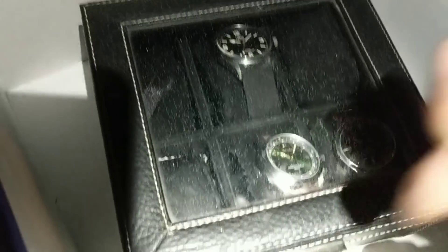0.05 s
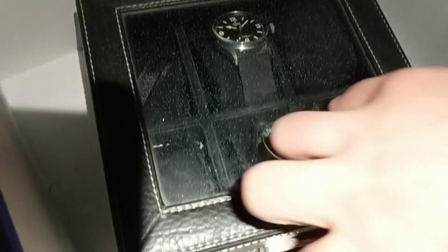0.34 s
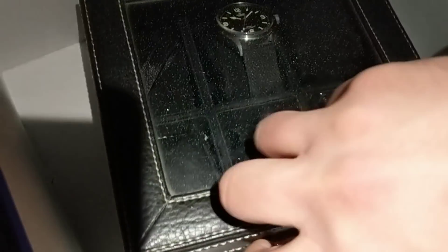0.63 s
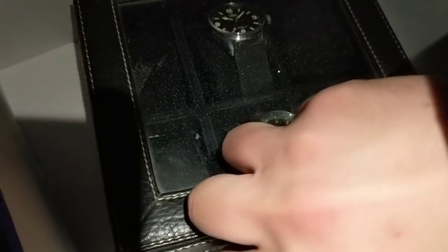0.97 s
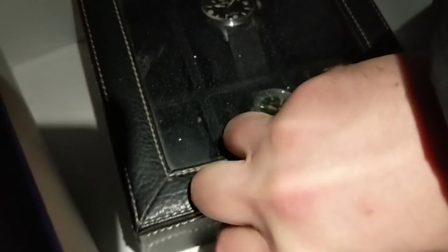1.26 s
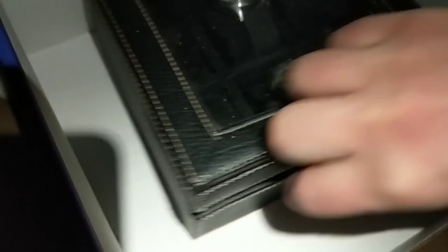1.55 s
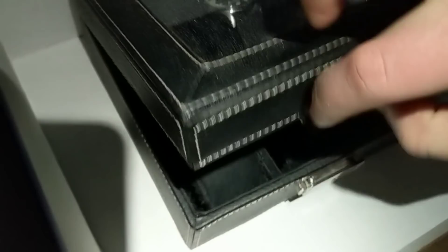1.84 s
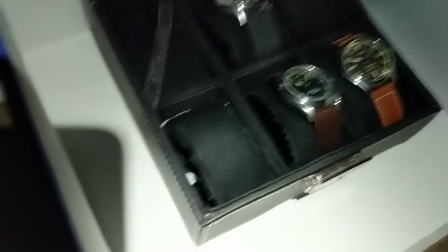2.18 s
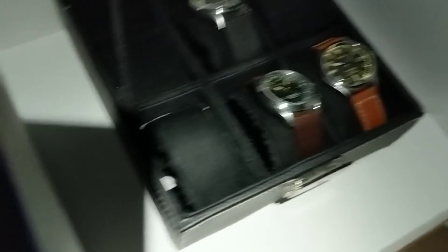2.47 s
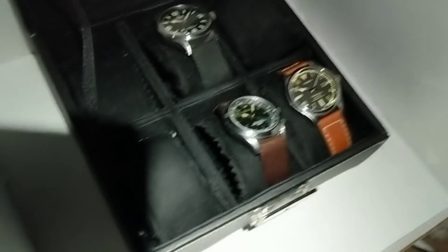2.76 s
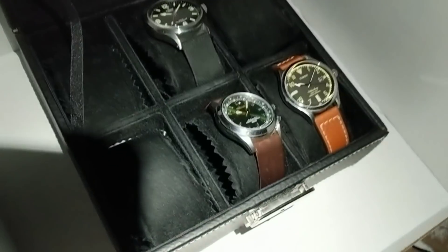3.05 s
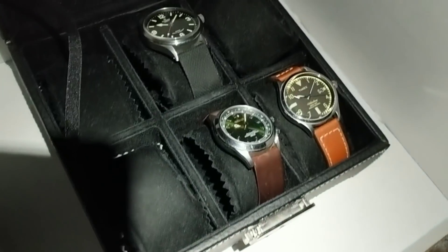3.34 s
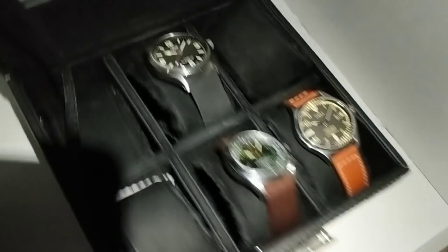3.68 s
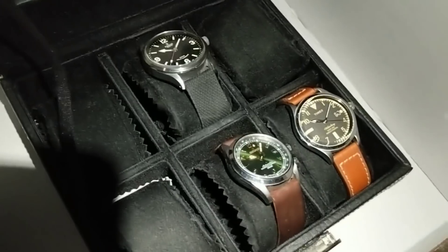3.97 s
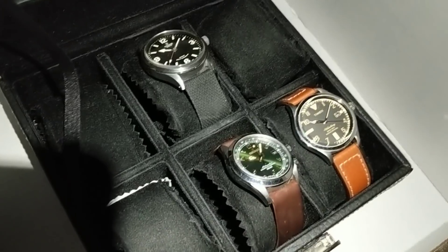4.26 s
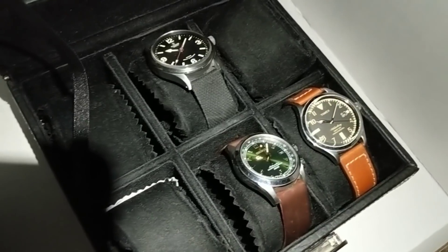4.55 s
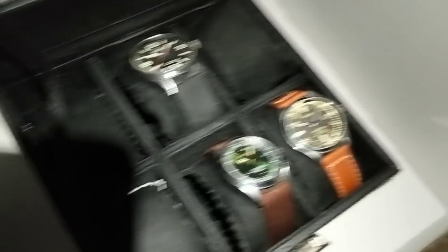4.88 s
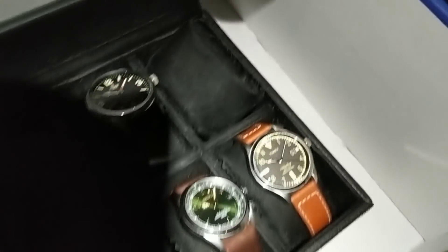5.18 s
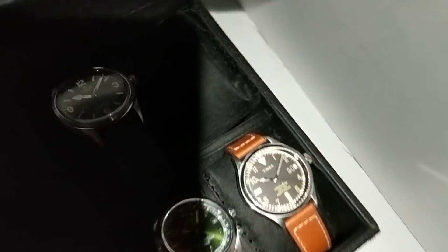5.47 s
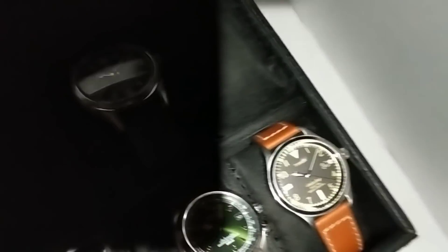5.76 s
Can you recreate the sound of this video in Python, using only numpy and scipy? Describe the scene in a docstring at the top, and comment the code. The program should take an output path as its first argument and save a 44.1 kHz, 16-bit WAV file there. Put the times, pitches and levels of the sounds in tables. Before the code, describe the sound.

Heard very close in a small, quiet room, a hand handles a leather watch box over faint sleeve swish and low rumble. From 0.3 seconds come light hollow taps and creaks, with a short, low hum of a fingertip juddering on the lid's window around 0.5. A faint metal tick sounds at 0.8, then rubbing and crackling from 1.2. At 1.6 the steel catch snaps with a sharp, very high ping, the loudest moment, followed by a scrape at 1.8. From 2.2 to 2.9 the lid swings open with dense leather scrapes, crackles, knocks and a tiny squeak, ending in soft thuds of the box on its shelf. Around 3.5 the box bumps again and drags, with a crisp, crackling scrape at 3.7 and a small tap. After 4 seconds it is nearly quiet, until a faint tap at 5.7 and a soft sleeve swish.

```python
"""A leather watch box is opened by hand: leather scrapes and crackles by stick-slip friction,
the steel catch snaps and rings, and the window lid swings open. Finger taps excite the modes of the box,
a fingertip judders on the window, and the box bumps on its shelf. The microphone is close,
in a small, quiet room, with a sleeve swishing past it and a low rumble of handling."""
import sys
import numpy as np
from scipy import signal
from scipy.io import wavfile
from scipy.ndimage import uniform_filter1d

SR = 44100
rng = np.random.default_rng(int(sys.argv[2]) if len(sys.argv) > 2 else 0)


def wav_out(sig):
    """Save sig, one row per channel (or a flat mono array), as 16-bit PCM at SR to the path in sys.argv[1]."""
    wavfile.write(sys.argv[1], SR, np.round(np.clip(np.atleast_2d(sig).T, -1, 1) * 32767).astype(np.int16))


N = 260939

# Leather sliding on skin and shelf as the hand lands, works the catch, swings the lid and drags the box:
# (start [s], length [s], level [dB], attack [s], release [s], swell [dB], hollow body [dB],
# hiss share [dB], hiss tilt [dB/octave], unevenness [dB], pitch of rasp and hollow [ratio])
STROKES = [ (0.346, .09, -46, .01, 0.051, -9, -12, 0, -5, 8, 1),
           (1.164, .19, -39, 0.0063, 0.051, -1, -11.5, -5, -5, 1, 0.82),
           (1.349, 0.15, -46, 0.038, 0.035, -8, -7.5, -3.5, -2.5, 5.5, 1.01),
           (1.529, 0.14, -38.5, 0.044, 0.033, -7, -2.5, -7, 5, -0.5, 1.08),
           (1.676, 0.056, -36, 0.0036, 0.0099, -17, -6.5, -4.5, 0, 2, 0.91),
           (1.733, 0.091, -57.5, 0.024, 0.047, -1, 20.5, -13, -2, 3, 0.53),
           (1.816, .13, -24, 0.046, 0.015, -6, -12, -2.5, -1, -1, 1.06),
           (2.281, 0.17, -40, 0.0031, 0.042, 3, -0.5, -5.5, -1, 4, 1),
           (2.415, 0.063, -33.5, 0.013, 0.0054, 9, -5.5, -2.5, 6, 3, 1.52),
           (2.473, .04, -19.5, 0.01, 0.015, -8, -9.5, 3, 3.5, 0.5, 0.97),
           (2.49, .2, -25, 0.018, .06, -1, -10, -1.56, -3.5, 2, 0.98),
           (2.682, .142, -22.5, 0.011, .045, 13, -12, -3.5, -2.5, 1, 0.86),
           (2.801, 0.12, -49, 0.0056, 0.033, -35, 2.5, 0, 5, 8, 0.71),
           (3.604, 0.26, -32.5, .004, .03, -1.5, -9.5, -2, -5, 3.5, 0.96),
           (3.706, 0.091, -20.5, 0.0031, 0.041, 3.5, -20.5, -0.5, -6, 1, 1.05),
           (4.183, .2, -54.5, .06, 0.1, -1, -9, -10, -2, 3, 0.74)]
# Spectrum of the hollow box: (frequency [Hz], level [dB])
HOLLOW_SPECTRUM = [(60, -29), (130, -10.5), (270, 2), (420, -8.5), (620, -1), (900, -14.5), (1500, -15),
                   (4000, -55.5)]


def stroke(start, length, db, attack, release, swell_db, hollow_db, hiss_db, tilt, uneven_db, pitch):
    """Stick-slip friction: clumps of slips rasp and hiss at the surface and drive the hollow box."""
    # Coarse and fine friction spectra: (frequency [Hz], level [dB])
    rasp_spectrum = [(350, -19), (600, -10), (1050, 4.5), (1500, 3), (2000, 1.5), (2700, 4), (3800, -0.5),
                     (4800, -0.5), (6000, -8.5), (9000, -45.5)]
    hiss_spectrum = [(2500, -22.5), (4200, -6), (5300, -4), (6400, -2), (7800, 0), (8900, -3),
                     (10000, -1.5), (12000, -7), (15500, -12.5)]
    t = np.arange(0, length, 1 / SR)
    pressure_db = swell_db * (t / length - .5)
    clumps = amp(uneven_db * unit(uniform_filter1d(noise(len(t)), size=180)))
    drives = [reflect(slips(len(t), per_s=6000, spread_db=1.5, smooth=1.55) * clumps) for _ in range(3)]
    rasp = colour(drives[0], [(hz * pitch, level) for hz, level in rasp_spectrum])
    hiss = colour(drives[1], hiss_spectrum, tilt)
    hollow = colour(drives[2], [(hz * pitch, level) for hz, level in HOLLOW_SPECTRUM])
    hiss_share = np.clip(amp(hiss_db + .38 * pressure_db), 0, .97)  # grows as the stroke swells
    scrape = hiss_share * hiss + np.sqrt(1 - hiss_share ** 2) * rasp
    sound = amp(-1) * scrape + amp(hollow_db + .5) * hollow
    return start, amp(db + pressure_db) * envelope(t, length, attack, release) * sound


def crackle(start, db, tilt, lead_s=.003, lead_db=-12, rise_s=.00023, t60=.025):
    """Stress release: a crease starts to give, then lets go in a quick, dying flurry of slips."""
    # Spectrum of a yielding crease: (frequency [Hz], level [dB])
    crease_spectrum = [(150, -19), (500, 3.5), (1200, 0.5), (2400, 1), (3800, 2), (5500, 1.5), (7800, 5),
                       (10500, -0.5), (13000, -8), (15500, -4.5)]
    t = np.arange(4096) / SR
    free_s = np.maximum(t - lead_s, 0)
    giving = amp(lead_db) * np.minimum(t / lead_s, 1)
    shape = (giving + 1 - np.exp(-free_s / rise_s)) * decay(free_s, t60)
    flurry = slips(len(t), per_s=4000, spread_db=-6, smooth=.78) * shape
    burst = colour(reflect(flurry), crease_spectrum, tilt)
    return start - lead_s, amp(db - 2) * burst * np.sqrt(np.mean(shape ** 2)) / shape.max()


def shed_crackles(per_s=16, tries=8, above_stroke_db=3):
    """Random release: each stroke frees small creases that follow its level and its brightness."""
    for start, length, db, attack, release, swell_db, _, hiss_db, *_ in STROKES:
        for place, chance in rng.random((tries, 2)):
            if chance < per_s * length / tries:
                delay = attack + place * (length - attack - release)
                stroke_db = db + swell_db * (delay / length - .5)
                yield start + delay, stroke_db + above_stroke_db, .42 * hiss_db


def snap(start, db, hold_s, rise_s=.00019, flicker=.087):
    """Modal ringing: a bright steel ping, held level for a moment as by a limiter, then dying quickly."""
    # Ringing tones of the catch and its wall, plus a faint 8.3 kHz distortion tone from the
    # overloaded ping: (frequency [Hz], level [dB], t60 [s])
    ping_tones = [(11925, 0, .014), (11890, -33, .085), (12280, -25, .02), (8290, -28, .035),
                  (3213, -26, .02), (2526, -25, .02), (2258, -25, .02), (1998, -23, .023), (1032, -20, .03),
                  (409, -21, .04)]
    t = np.arange(SR // 6) / SR
    after_hold_s = np.maximum(t - hold_s, 0)
    ring = sum(amp(level) * decay(after_hold_s, t60) * np.sin(2 * np.pi * hz * t)
               for hz, level, t60 in ping_tones)
    uneven = 1 + flicker * unit(uniform_filter1d(noise(len(t)), size=50))
    return start, amp(db) * ring * uneven * (1 - np.exp(-t / rise_s))


def knock(start, db, hardness, lowest_hz, rise_s=.00038, scatter_db=6.5):
    """Modal excitation: a harder blow favours the higher modes; the fingertip scuffs as it lands."""
    # Modes of the box: (frequency [Hz], level [dB], base t60 [s])
    box_modes = [(300, 3.5, 0.061), (466, -12.5, 0.033), (634, -8, 0.045), (790, -32.5, 0.012),
                 (1045, -2.5, 0.035), (1220, -10, 0.024), (2022, -12.5, 0.019), (2586, -17, 0.026),
                 (3220, -25.5, 0.026)]
    t = np.arange(SR // 5) / SR
    hz, level, t60 = np.array(box_modes, float).T[:, :, None]
    hz[0] = lowest_hz  # the lowest mode moves with the grip
    t60 *= .85 * .5 ** (hardness / 8.6)  # a firm finger damps the ring
    mode_db = level + scatter_db * noise(hz.shape) + hardness * np.log2(hz / lowest_hz)
    gains = amp(mode_db) * rng.choice([-1, 1], hz.shape)
    ring = (gains * decay(t, t60) * np.sin(2 * np.pi * hz * t)).sum(0)
    ring /= np.std(ring[:SR // 200])
    scuff = amp(-9) * colour(noise(len(t)), HOLLOW_SPECTRUM, hardness + 5) * decay(t, t60=.06)
    return start, amp(db) * (ring + scuff) * (1 - np.exp(-t / rise_s))


def bump(start, db, hz, t60, rise_s=.0034):
    """Damped oscillation: the weight of the box gives the shelf a soft, low push."""
    t = np.arange(SR // 3) / SR
    thud = np.sin(2 * np.pi * hz * t) * (1 - np.exp(-t / rise_s)) * decay(t, t60)
    return start, amp(db) * thud / abs(thud).max()


def judder(start, length, db, base_hz=157.5, drop_hz=22, settle_s=.017, sag_hz_per_s=22):
    """Periodic stick-slip: skin on the window gives a nearly pure tone that drops quickly, then sags."""
    t = np.arange(0, length, 1 / SR)
    hz = base_hz + drop_hz * np.exp(-t / settle_s) - sag_hz_per_s * t
    phase = 2 * np.pi * np.cumsum(hz) / SR
    tone = np.sin(phase) + amp(-25) * (np.sin(2 * phase) + np.sin(3 * phase))
    return start, amp(db) * envelope(t, length, attack=.018, release=.072) * tone


def squeak(start, length, db, hz, width_hz):
    """Narrow-band friction noise: for an instant the slips fall nearly into step and whistle."""
    whistle = unit(bandpass(noise(round(length * SR)), hz - width_hz / 2, hz + width_hz / 2))
    return start, amp(db) * whistle * signal.windows.tukey(len(whistle), .5)


def reflect(x, strength=.14, count=6):
    """Comb filtering: hand, lid and shelf return each contact within 4 ms."""
    taps = np.zeros(SR // 250)
    taps[rng.integers(len(taps) // 10, len(taps), count)] = strength * rng.choice([-1, 1], count)
    taps[0] = 1
    return signal.lfilter(taps, 1, x)


def room(x, low_t60=.28, high_t60=.225, wet_db=-22, echoes_per_s=3000):
    """Reverberation: near walls return a short tail whose treble dies first."""
    t = np.arange(SR // 2) / SR
    echoes = noise(len(t)) * (rng.random(len(t)) < echoes_per_s / SR) * (t > .004)
    low = signal.sosfilt(signal.butter(2, 1500, fs=SR, output="sos"), echoes)
    high = bandpass(echoes, 1500, 7000)
    tail = low * decay(t, low_t60) + .5 * high * decay(t, high_t60)
    return amp(wet_db) * signal.fftconvolve(x, tail / np.linalg.norm(tail))[:N]


def arm_motion(still_sleeve_db=-58, still_grip_db=-56.5):
    """Incoherent addition: a bell-shaped swell per movement adds in power to sleeve and grip gains."""
    # Arm movements: (peak time [s], half width [s], sleeve swish [dB], grip rumble [dB])
    moves = [(.55, 0.41, -50, -49.5), (1.2, .35, -51.5, -49), (1.7, 0.23, -48, -42),
             (2.45, 0.43, -47.5, -48), (3.07, 0.045, -52, -45.5), (3.718, 0.18, -45.5, -47),
             (4.95, 0.067, -59, -61), (5.92, 0.2, -47, -55.5)]
    t = np.arange(N) / SR
    power = amp([[still_sleeve_db], [still_grip_db]]) ** 2
    for peak, width, sleeve_db, grip_db in moves:
        swell = np.exp(-.5 * ((t - peak) / width) ** 2)
        power = power + (amp([[sleeve_db], [grip_db]]) * swell) ** 2
    return np.sqrt(power)


def background(air_db=-53, port_band_hz=(7200, 8100)):
    """Broadband noise: sleeve, grip and room air, lifted to a hiss at the microphone's port resonance."""
    # Spectra of sleeve friction, grip rumble and room air: (frequency [Hz], level [dB])
    cloth_spectrum = [(200, -4.5), (600, 4), (1200, 2), (2500, -1), (5000, -1.5), (7500, -2), (9500, -6.5),
                      (12000, -9.5), (15500, -23)]
    grip_spectrum = [(20, -49.5), (33, -16.5), (50, -3), (88, -4.5), (130, -8.5), (190, -15), (400, -27.5),
                     (1000, -64.5)]
    air_spectrum = [(25, -55.5), (45, -15.5), (89, 0.5), (130, -7.5), (246, -11.5), (359, -15),
                    (970, -15.5), (1620, -19), (3720, -29), (5730, -31.5), (7500, -27.5), (8800, -38.5),
                    (15500, -34.5)]
    swish, rumble = arm_motion()
    air = amp(air_db) * colour(noise(N), air_spectrum)
    sleeve = swish * amp(-3) * colour(slips(N, per_s=2800, spread_db=6, smooth=1.6), cloth_spectrum)
    grip = rumble * colour(noise(N), grip_spectrum)
    quiet = air + sleeve + grip
    return quiet + amp(-1) * bandpass(quiet, *port_band_hz)


def slips(count, per_s, spread_db, smooth):
    """Shot noise: tiny stick-slip releases of uneven size over a smooth hiss."""
    sizes = amp(spread_db * np.minimum(rng.exponential(1, count), 3.5))
    releases = noise(count) * sizes * (rng.random(count) < per_s / SR)
    return unit(releases) + smooth * noise(count)


def colour(x, spectrum, tilt=0):
    """Minimum-phase filtering by a spectrum, tilted in dB/octave about 4 kHz; the result has rms 1."""
    hz = abs(np.fft.fftfreq(4096, 1 / SR)) + 1
    point_hz, point_db = np.transpose(spectrum)
    octaves = np.log2(np.clip(hz, 500, 11000) / 4000)
    gain_db = np.interp(np.log(hz), np.log(point_hz), point_db) + tilt * octaves
    response = np.exp(np.conj(signal.hilbert(np.log(amp(gain_db)))))
    taps = np.fft.ifft(response).real[:len(hz) // 2]
    return unit(signal.oaconvolve(x, taps)[:len(x)])


def bandpass(x, low_hz, high_hz):
    """Passes one frequency band."""
    return signal.sosfilt(signal.butter(2, [low_hz, high_hz], "band", fs=SR, output="sos"), x)


def envelope(t, length, attack, release):
    """Linear rise, hold and quadratic release."""
    return np.clip(t / attack, 0, 1) * np.clip((length - t) / release, 0, 1) ** 2


def decay(t, t60):
    """Exponential damping: 60 dB down at t60."""
    return amp(-60 * t / t60)


def noise(count):
    """White noise."""
    return rng.standard_normal(count)


def amp(db):
    """Decibels to gain."""
    return 10 ** (np.asarray(db) / 20)


def unit(x):
    """Scales to rms 1."""
    return x / np.sqrt(np.mean(x ** 2) + 1e-20)


def add(mix, start, sound):
    """Mixes a sound in at start [s]."""
    part = mix[max(round(start * SR), 0):][:len(sound)]
    part += sound[:len(part)]


def scene():
    """Superposition: every contact with the box, its reverberation and the background."""
    # Creases of leather and hinge: (time [s], level [dB], tilt [dB/octave])
    crackles = [(0.3311, -27, -2), (.375, -38, 1), (0.6374, -35.5, 0.5), (0.842, -27.5, -4),
                (1.0216, -33.5, -5), (1.1657, -32, 1), (1.1787, -28, -2.5), (1.2106, -18.5, -2.5),
                (1.264, -25.5, -5), (1.4222, -33.5, -3.5), (1.5209, -30, -0.5), (1.5494, -22.5, -.5),
                (1.5554, -26.5, -3.5), (1.5973, -15.5, -3), (1.6846, -13, -1.5), (1.9505, -27.5, 0),
                (2.138, -36, -1), (2.1889, -28.5, -4), (2.2408, -37, -3), (2.2852, -25, -0.5),
                (2.3087, -24.5, 2), (2.3511, -17, 4), (2.3835, -25.5, -4.5), (2.4498, -20.5, 10),
                (2.5227, -20, -2.5), (2.5661, -16.5, -1.5), (2.825, -19.5, -1), (2.8489, -29, -0.5),
                (2.8609, -27, -1.5), (2.8873, -34, -4), (3.026, -42, 0), (3.0589, -39, -3),
                (3.0869, -33.5, -3.5), (3.4146, -42.5, -2), (3.5214, -19.5, -2.5), (3.5334, -27.5, -1),
                (3.5718, -24.5, -2), (3.708, -11, -0.5), (3.7334, -14, 9), (3.8601, -23, -4),
                (4.028, -43, -4.5), (5.665, -42, -11)]
    # The steel catch springing: (time [s], level [dB], hold time [s])
    snaps = [(0.8424, -26.5, 0.00066), (1.5972, -3.5, 0.0078)]
    # Taps on lid and walls: (time [s], level [dB], hardness [dB/octave], lowest mode [Hz])
    knocks = [(0.332, -35, -0.5, 286), (0.477, -28.5, 1, 310), (0.604, -34, -0.5, 330),
              (0.84, -36, -0.5, 317), (1.015, -39.5, -5, 293), (1.178, -31, 6, 324), (1.213, -24, 8, 268),
              (1.6, -20, 8, 420), (1.678, -26.5, -4.5, 255), (2.285, -26.5, -3.5, 324),
              (2.483, -19, 2, 398), (2.782, -23.5, -9, 270), (3.545, -26.5, -5.5, 250),
              (3.86, -31, 8.5, 288.6), (5.664, -39, -1, 214)]
    # The box meeting its shelf: (time [s], peak level [dB], frequency [Hz], t60 [s])
    bumps = [(1.443, -28.5, 102, 0.035), (1.582, -23.5, 254, 0.076), (1.676, -26.5, 105.5, 0.1),
             (2.184, -18.5, 117, 0.022), (2.285, -32, 93, 0.13), (2.779, -17.5, 125, 0.13),
             (2.779, -18, 233, 0.1), (2.822, -19, 133.4, 0.071), (2.886, -37, 141, .2),
             (3.181, -28, 102, 0.012), (3.545, -22.5, 170.3, 0.029), (3.577, -27, 119, 0.027)]
    # Leather squeaking: (time [s], length [s], level [dB], frequency [Hz], bandwidth [Hz])
    squeaks = [(1.418, 0.017, -45, 7000, 300), (2.521, 0.0184, -26.5, 3570, 330)]
    box, quiet = np.zeros(N), background()
    for source, events in ((knock, knocks), (bump, bumps), (snap, snaps), (crackle, crackles),
                           (stroke, STROKES), (squeak, squeaks), (crackle, shed_crackles())):
        for event in list(events):
            add(box, *source(*event))
    add(box, *judder(start=.445, length=.27, db=-39))
    return (box + room(box) + quiet)[None]


def record(dry, bass_cut_hz=42, ceiling=.87, treble_cut_hz=15650):
    """Band limiting and clipping: the microphone sheds deep bass, the loudest peaks and the top treble."""
    thinned = signal.sosfilt(signal.butter(3, bass_cut_hz, "high", fs=SR, output="sos"), dry)
    clipped = np.clip(thinned, -ceiling, ceiling)
    lowpass = signal.firwin(401, treble_cut_hz, window=("kaiser", 8), fs=SR)
    return signal.oaconvolve(clipped, lowpass[None], "same")


dry = scene()
out = record(dry)
wav_out(out)
```